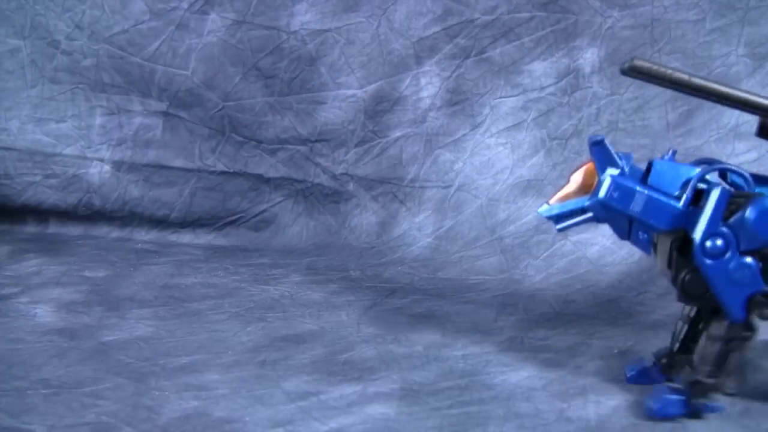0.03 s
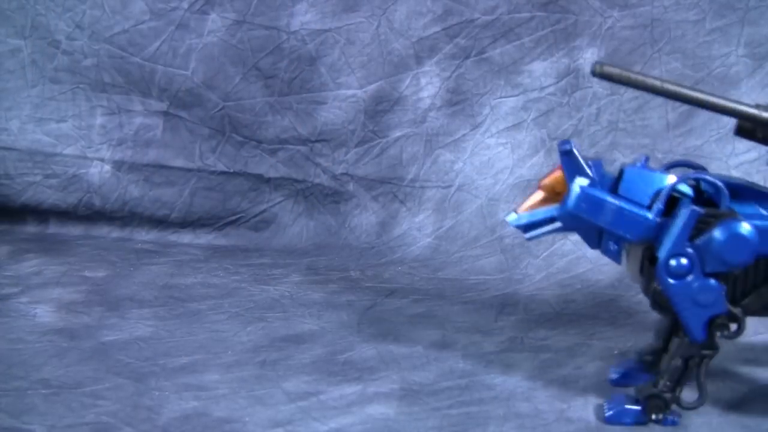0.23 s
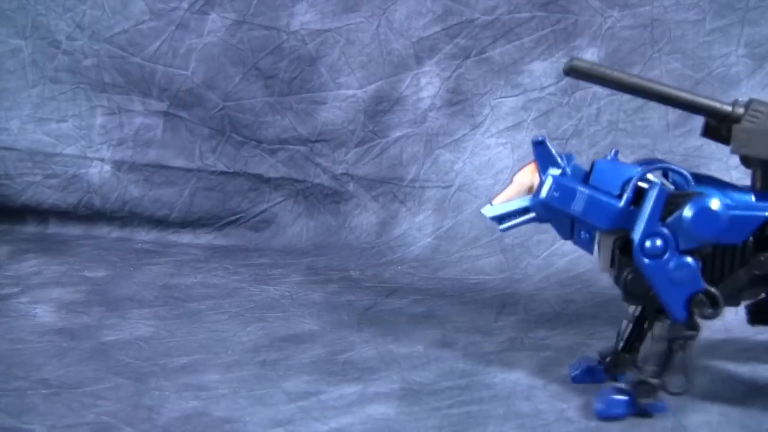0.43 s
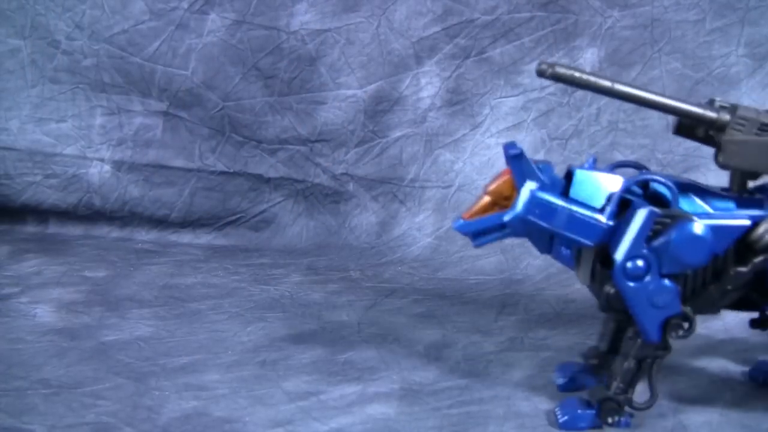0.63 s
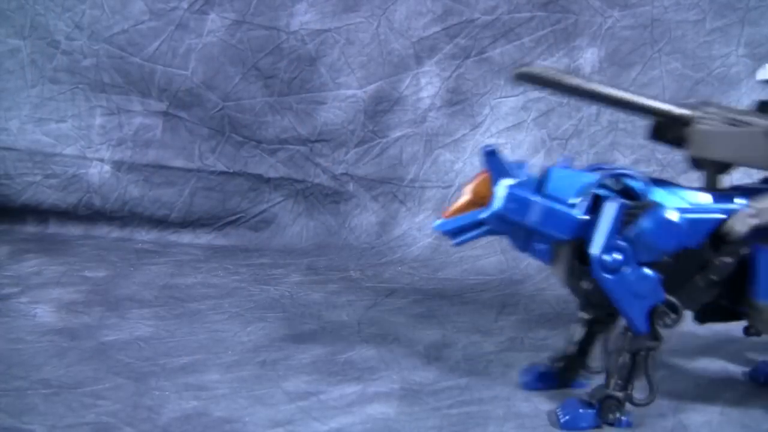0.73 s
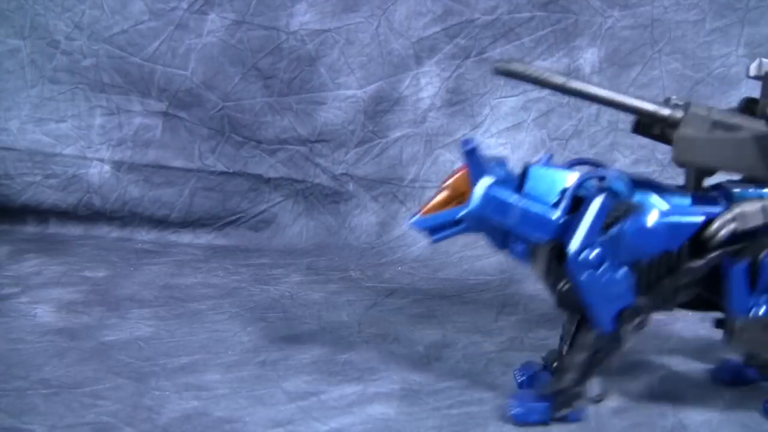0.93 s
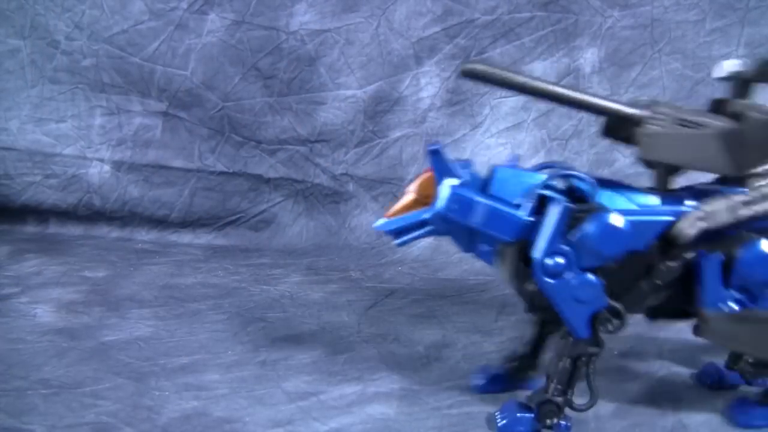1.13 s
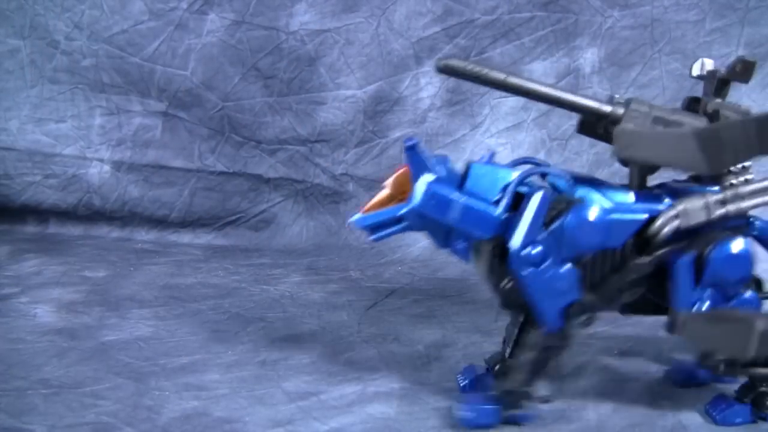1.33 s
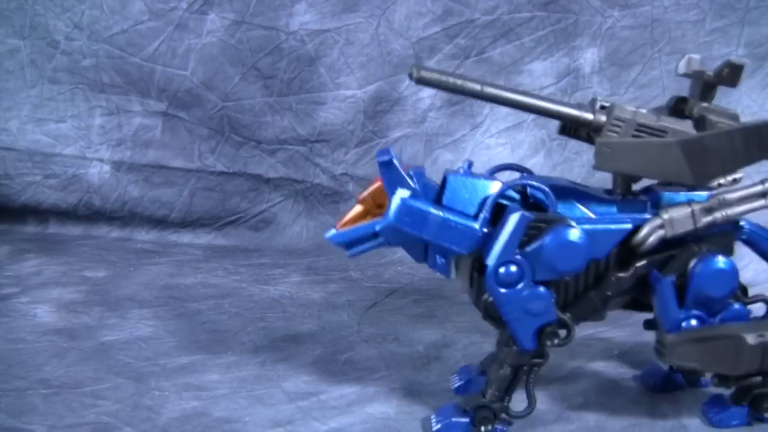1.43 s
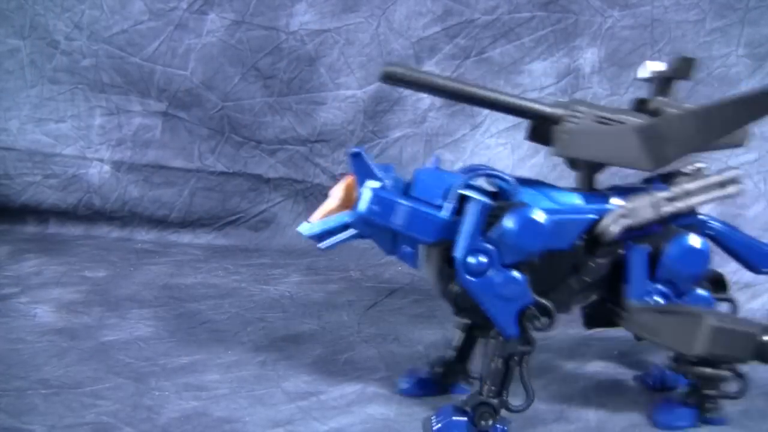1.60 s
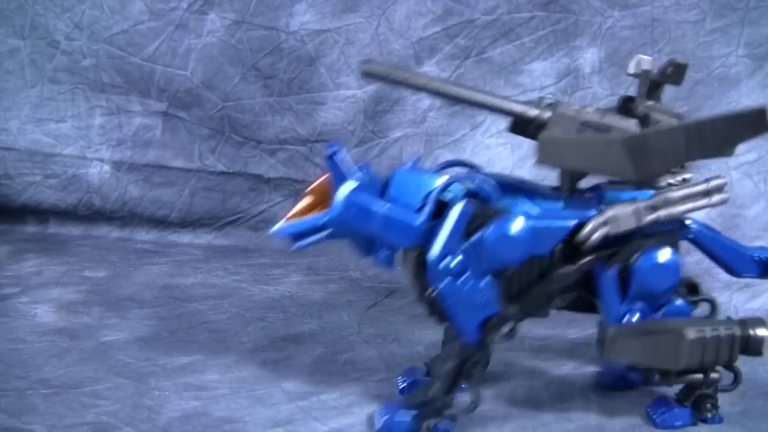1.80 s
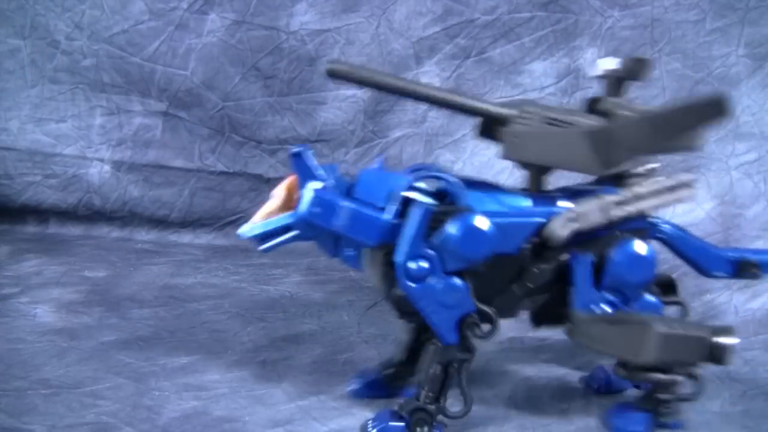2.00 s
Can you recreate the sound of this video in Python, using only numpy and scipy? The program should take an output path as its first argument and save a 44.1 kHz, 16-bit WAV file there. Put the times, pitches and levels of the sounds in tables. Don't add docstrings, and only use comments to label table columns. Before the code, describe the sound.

A plastic four-legged walking toy whirrs steadily on a table, its bright, hissy gear noise swelling with each quick stride. Light taps and dull thuds of the feet lie beneath, heard close in a quiet room.

```python
import sys
import numpy as np
from scipy import signal
from scipy.fft import rfft, irfft
from scipy.io import wavfile

SR = 44100
rng = np.random.default_rng(int(sys.argv[2]) if len(sys.argv) > 2 else 0)


def volts_from_db(level):
    exponent = np.asarray(level, float) / 20
    return 10 ** exponent


def log_audio(samples):
    frames = np.atleast_2d(samples).T
    limited = np.clip(frames, -1, 1)
    pcm = np.round(limited * 32767).astype(np.int16)
    wavfile.write(sys.argv[1], SR, pcm)


N = 90581
TIME = np.arange(N) / SR

# (heaviest load [s], gearbox swell [dB], governor swell [dB], rasp swell [dB], length factor [1])
STRIDES = [(0.0, 4.5, 5, 5, 1.1), (0.227, 5.5, 1, 7.5, 0.83), (0.439, 4.5, 2.5, 5.5, 1.76),
           (0.638, 7.5, 3.5, 8, 0.7), (0.835, 6, 5.5, 5, 1.43), (1.055, 7, 4, 6.5, 0.97),
           (1.25, 7, 5, 4.5, 1.2), (1.485, 7.5, 1, 8.5, 0.67), (1.682, 7, 3, 3, 1.33),
           (1.921, 7, 1.5, 6.5, 1.04), (2.05, 5, 0.5, -4, .9)]
# (time [s], nearness [dB], share of the way to the middle [0-1])
WALK = [
    (0, 0.5, 0.1),
    (0.5, 0.45, 0.19),
    (1.0, 1.0, 0.34),
    (1.5, 1.62, 0.63),
    (2.05, 1.0, 0.89),
]
# (frequency [Hz], width [Hz], level at the right [dB], change on the way [dB])
GEARBOX_MODES = [(4475, 390, -15.5, 3), (4950, 170, -11, 8), (5267, 94, 0, -0.5), (5464, 176, -3, 3),
                 (5702, 242, -3, 0), (6100, 350, -6, -3), (6524, 360, -13, -1)]
GOVERNOR_MODES = [(9200, 540, -11, 0.79), (10290, 520, -9.5, -0.055), (10890, 126, -0.5, -2.5),
                  (11100, 170, -1, -1.8), (11440, 430, -2.5, -0.79), (12000, 400, -10.5, -0.67),
                  (12060, 1230, -17, -0.35)]
SHELL_MODES = [(1334, 140, -2, 2.5), (1594, 446, -4.5, -2), (2049, 230, -4.5, -4.5), (2103, 27, 3.5, -10),
               (2610, 550, -7.5, -3), (2724, 32, 2, -9), (3150, 213, -12, -7.5), (3983, 143, -6, 3)]
# (frequency [Hz], density [dB per Hz])
HISS_SPECTRUM = [(2000, -2.5), (4500, 0), (7300, 5.5), (8500, 6), (12500, 0.5), (14000, -19), (15000, -3.5),
                 (16500, -11)]
# (frequency [Hz], change [dB])
HISS_TURN = [(2000, -9.5), (12500, 0.5), (13900, 9), (16500, 8)]
# (frequency [Hz], density [dB per Hz])
RASP_SPECTRUM = [(350, -4), (900, -3), (1300, -20.5), (2600, 1.5), (4300, -2.5), (8000, 5), (14000, -1)]
# (time [s], table thud [dB], shell tap [dB], table sway [dB], hardness [dB per octave])
LANDINGS = [(0.225, -54, -57, -76, -8), (0.244, -59, -37.5, -86, -11), (0.265, -57, -59, -67, -13),
            (0.421, -56.5, -45, -67, -6), (0.625, -58, -60, -54, -3), (0.822, -62, -44, -81, 1),
            (1.058, -60, -54, -64, -3), (1.075, -55.5, -36, -80, -1), (1.102, -54, -46, -78, 4),
            (1.25, -59, -40, -67, 5), (1.325, -61, -45, -70, -17.5), (1.399, -71, -44, -57.5, -1),
            (1.493, -58.5, -36, -63, -5), (1.679, -53, -49, -66, 4), (1.912, -55.5, -56, -85, 8),
            (1.934, -73, -36.5, -85, 5), (2.009, -56, -67, -53, 0.5)]
# (frequency [Hz], level [dB], t60 [s])
TABLE_MODES = [(192, -2, 0.065), (283, -0.5, 0.15), (489, 4, 0.042), (620, -4, 0.045)]
TAPPED_MODES = [(1270, 2, 0.02), (1396, -1, 0.093), (1550, -1, 0.069), (2790, -17, 0.023)]
SWAY_MODES = [(31.2, 7, 0.37)]
# (time [s], level [dB])
SNAPS = [
    (0.627, -50),
    (1.103, -59),
    (2.011, -41),
]
# (frequency [Hz], density [dB per Hz])
ROOM_SPECTRUM = [(12, -30), (20, 2), (109, -2.5), (171, -4.5), (460, -1.5), (602, -8.5), (761, -3.5),
                 (855, -12), (1100, -0.5), (1430, 6), (2420, -120)]
# (frequency [Hz], side level [dB])
ROOM_SIDE = [(25, -11), (60, -19), (150, -1.5), (300, -4.5), (900, -13)]
# (frequency [Hz], rms level [dB])
HUM = [(32, -67), (60, -72), (90, -68.5), (120, -66)]
# (frequency [Hz], in step at the right [dB], in step in the middle [dB],
# scattered at the right [dB], scattered in the middle [dB])
PORTS = [(1460, -14.5, -32, -20, -32), (3150, -10.5, -21, -13, -25), (5600, -3.5, -21, -15, -29),
         (7700, -1, -5, -15, -22), (10300, -26, -16, -6, -22), (12600, -28, -42, 1.5, -19),
         (14300, 3, -15, 3, -1), (15900, 5, -21, -4, -11)]

TEETH_PER_S, TOOTH_JITTER, TOOTH_SPREAD_DB, TEETH_SHARE_DB = 680, 0.25, -1, -8
RUB_PER_S, RUB_SPREAD_DB = 9000, 1.5
CLUMP_DB, CLUMPS_PER_S = 1.15, 290
LOAD_RISE_S, LOAD_FALL_S = 0.052, 0.053
WANDER_DB, WANDER_PER_S = 1.18, 14
FLUTTER_DB, FLUTTER_PER_S = 0.4, 40
GEARBOX_DB, GOVERNOR_DB, SHELL_DB, HISS_DB, RASP_DB = -42.5, -42, -48.5, -43.5, -63
SHELL_LOW_HZ, SHELL_FOLLOWS, RASP_STEEPNESS = 1084, 0.56, 2.76
CONTACT_S, TABLE_CENTRE_HZ = 0.0027, 350
SNAP_LOW_HZ, SNAP_HIGH_HZ = 120, 700
ROOM_DB, ROOM_LEAN, HUM_WAVER_DB = -55.5, 0.15, 1.5
PORT_TURN_RAD, CLOSING = 1.88, 1.78


def rms_one(x):
    return x / np.sqrt(np.mean(x ** 2) + 1e-20)


def colour(x, points, turn=1):
    octave = np.log2(np.fft.rfftfreq(N, 1 / SR) + 1)
    hz, db = np.transpose(points)
    knots = np.log2(hz)
    below = np.maximum(knots[0] - octave, 0)
    above = np.maximum(octave - knots[-1], 0)
    gain_db = np.interp(octave, knots, db) - 27 * (below + above)
    return irfft(rfft(x) * volts_from_db(gain_db) * turn, N)


def drift(rate):
    r = np.exp(-2 * np.pi * rate / SR)
    slow = signal.lfilter([1], [1, -2 * r, r * r], rng.standard_normal(N + SR))
    return rms_one(slow[SR:])


def chatter():
    size = np.minimum(rng.exponential(1, N), 5)
    sign = rng.choice([-1, 1], N)
    rub = sign * volts_from_db(RUB_SPREAD_DB * size) * (rng.random(N) < RUB_PER_S / SR)
    teeth_passed = TEETH_PER_S * TIME + TOOTH_JITTER * drift(150)
    contact = np.diff(np.floor(teeth_passed), prepend=0) > 0
    teeth = contact * volts_from_db(TOOTH_SPREAD_DB * size)
    clumps = volts_from_db(CLUMP_DB * drift(CLUMPS_PER_S))
    return rms_one(clumps * (rms_one(rub) + volts_from_db(TEETH_SHARE_DB) * rms_one(teeth)))


def load_db():
    load = np.zeros((3, N))
    for s, *db, length in STRIDES:
        away = (TIME - s) / length
        spread = np.where(away < 0, LOAD_RISE_S, LOAD_FALL_S)
        swell = np.exp(-0.5 * (away / spread) ** 2)
        load = np.maximum(load, np.outer(db, swell))
    return load


def resonate(x, modes, way):
    out = 0
    for k, (hz, width, db, change_db) in enumerate(modes):
        r = np.exp(-np.pi * width / SR)
        poles = [1, -2 * r * np.cos(2 * np.pi * hz / SR), r * r]
        ring = signal.lfilter([(1 - r * r) / 2, 0, (r * r - 1) / 2], poles, x)
        level = volts_from_db(db + change_db * way + WANDER_DB * drift(WANDER_PER_S))
        out = out + (-1) ** k * level * ring
    return out


def gears(load, way):
    gearbox_load, governor_load, rasp_load = load
    drive = chatter()
    hiss = colour(chatter(), HISS_SPECTRUM)
    hiss = hiss + way * (colour(hiss, HISS_TURN) - hiss)
    cut = signal.butter(6, SHELL_LOW_HZ, "high", fs=SR, output="sos")
    shell = signal.sosfilt(cut, resonate(drive, SHELL_MODES, way))
    rasp = colour(chatter(), RASP_SPECTRUM)
    flutter = FLUTTER_DB * drift(FLUTTER_PER_S)
    layers = [(resonate(drive, GEARBOX_MODES, way), GEARBOX_DB + gearbox_load),
              (resonate(drive, GOVERNOR_MODES, way), GOVERNOR_DB + governor_load),
              (shell, SHELL_DB + SHELL_FOLLOWS * rasp_load),
              (rasp, RASP_DB + RASP_STEEPNESS * rasp_load),
              (hiss, HISS_DB + 0.27 * gearbox_load + 0.16 * governor_load)]
    return sum(rms_one(x) * volts_from_db(db + flutter) for x, db in layers)


def feet():
    out = np.zeros(N)
    s, *levels, hardness = np.transpose(LANDINGS)
    soft = np.exp(-1 / (CONTACT_S * SR))
    for modes, level_db in zip((TABLE_MODES, TAPPED_MODES, SWAY_MODES), levels):
        vary_db = rng.normal(0, 1.5, (len(s), len(modes)))
        for k, (hz, db, t60) in enumerate(modes):
            hit_db = level_db + db + vary_db[:, k]
            if modes is TABLE_MODES:
                hit_db = hit_db + hardness * np.log2(hz / TABLE_CENTRE_HZ)
            hits = np.full(N, 1e-18)
            hits[(s * SR).astype(int)] = volts_from_db(hit_db)
            r = volts_from_db(-60 / (t60 * SR))
            turn = np.exp(2j * np.pi * hz / SR)
            ring = signal.lfilter([1], np.poly([r * turn, soft * turn]), hits)
            out += ring.imag * (1 - soft)
    return out


def snaps():
    push = np.full(N, 1e-18)
    s, db = np.transpose(SNAPS)
    push[(s * SR).astype(int)] = volts_from_db(db) * SR / (2 * SNAP_HIGH_HZ)
    band = signal.butter(2, [SNAP_LOW_HZ, SNAP_HIGH_HZ], "band", fs=SR, output="sos")
    return signal.sosfilt(band, push)


def room():
    noise = rng.standard_normal((2, N))
    mid, side = (volts_from_db(ROOM_DB) * rms_one(colour(w, ROOM_SPECTRUM)) for w in noise)
    hum = np.zeros(N)
    for hz, db in HUM:
        level = np.sqrt(2) * volts_from_db(db + HUM_WAVER_DB * drift(5.3))
        hum += level * np.sin(2 * np.pi * hz * TIME + rng.uniform(0, 7))
    return mid + hum, colour(side, ROOM_SIDE) + ROOM_LEAN * (hum - mid)


def port_side(mid, scattered, column):
    ports = np.array(PORTS)
    in_step = colour(mid, ports[:, [0, column]], turn=np.exp(-1j * PORT_TURN_RAD))
    return in_step + colour(scattered, ports[:, [0, column + 2]])


def scene():
    s, *columns = np.transpose(WALK)
    near_db, way = (np.interp(TIME, s, c) for c in columns)
    way = np.clip(way, 0, 1)
    load = load_db()
    direct = volts_from_db(near_db) * gears(load, way)
    scattered = volts_from_db(near_db) * gears(load, way)
    mid = direct + feet() + snaps()
    at_right = port_side(mid, scattered, 1)
    in_middle = port_side(mid, scattered, 2)
    side = (1 - way) ** CLOSING * (at_right - in_middle) + in_middle
    room_mid, room_side = room()
    mid, side = mid + room_mid, side + room_side
    return np.array([mid + side, mid - side])


def roll_off(x):
    return signal.sosfilt(signal.butter(12, 15790, fs=SR, output="sos"), x)


def record(dry):
    return roll_off(dry)


dry = scene()
out = record(dry)
log_audio(out)
```